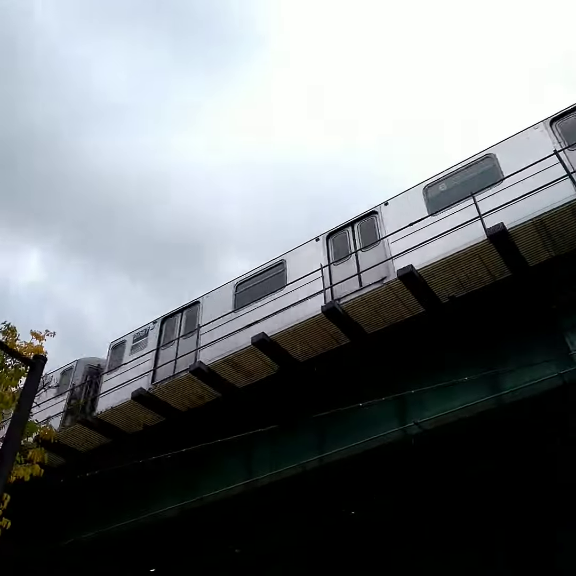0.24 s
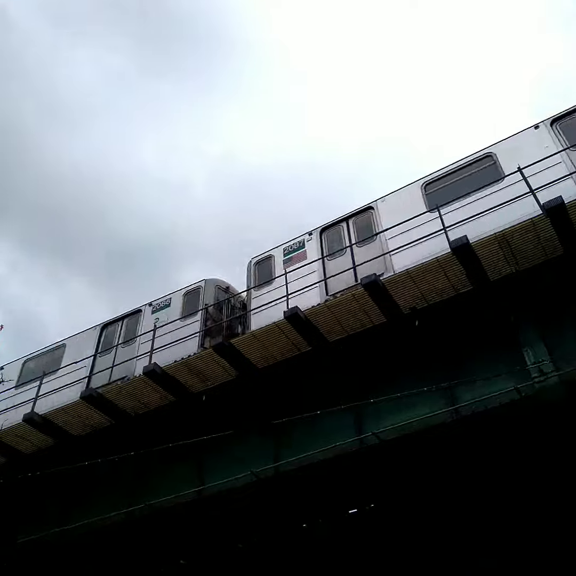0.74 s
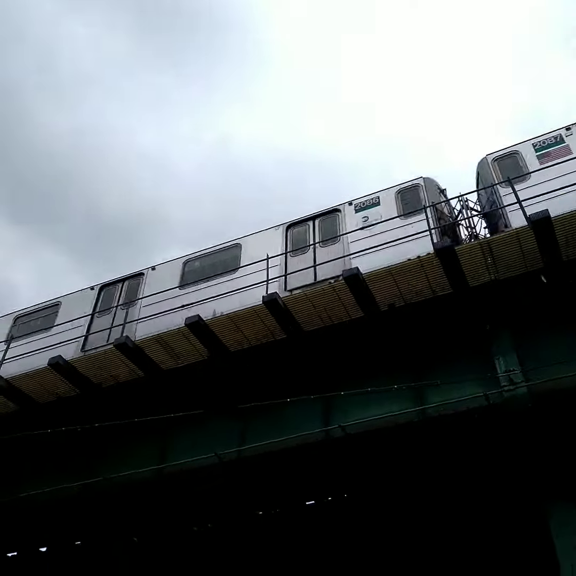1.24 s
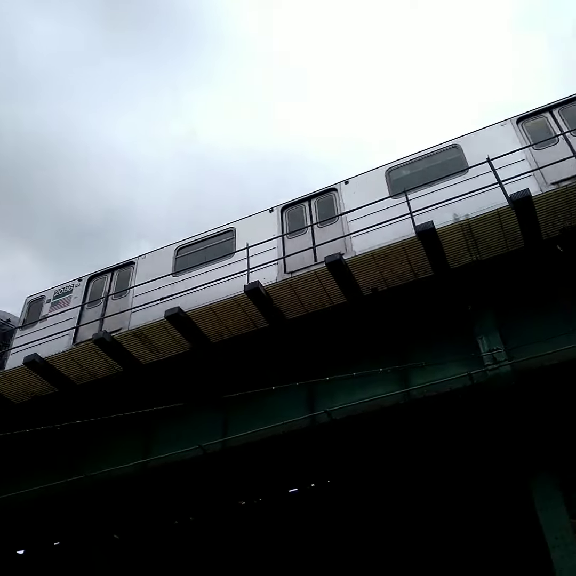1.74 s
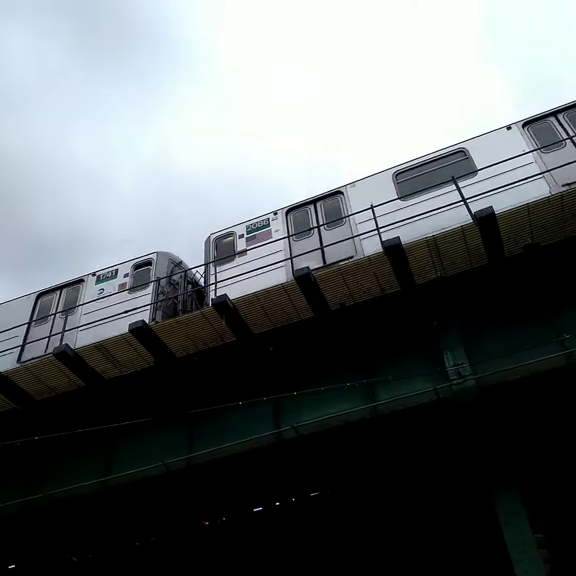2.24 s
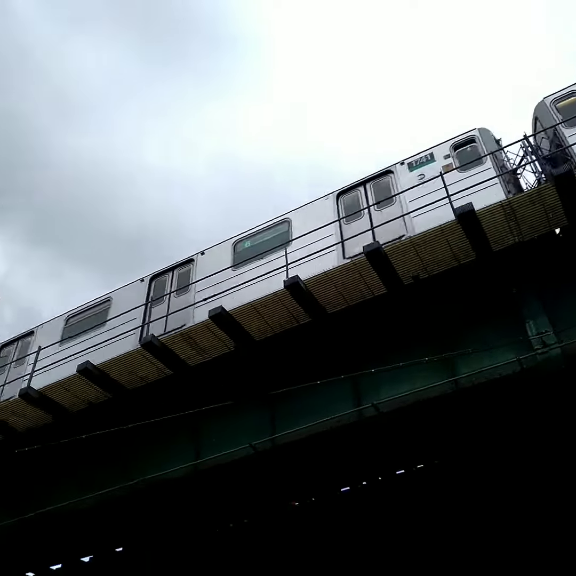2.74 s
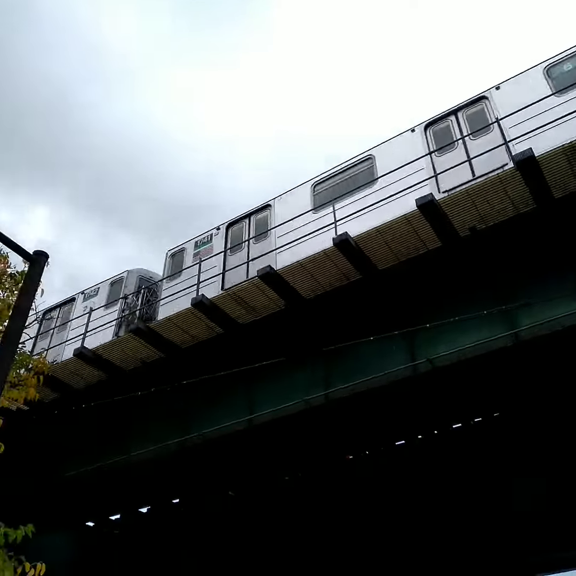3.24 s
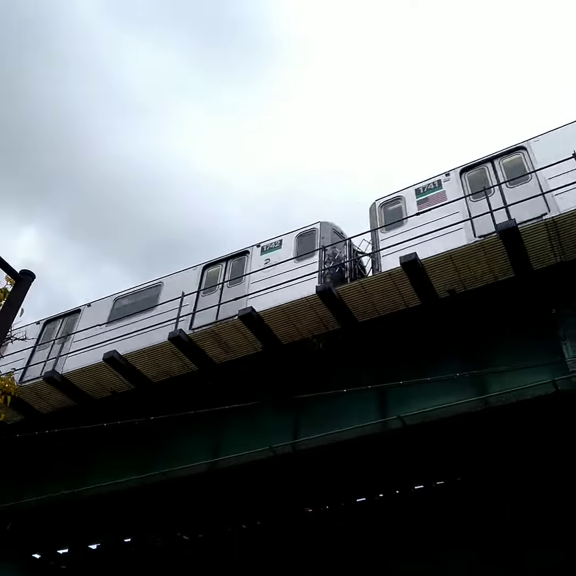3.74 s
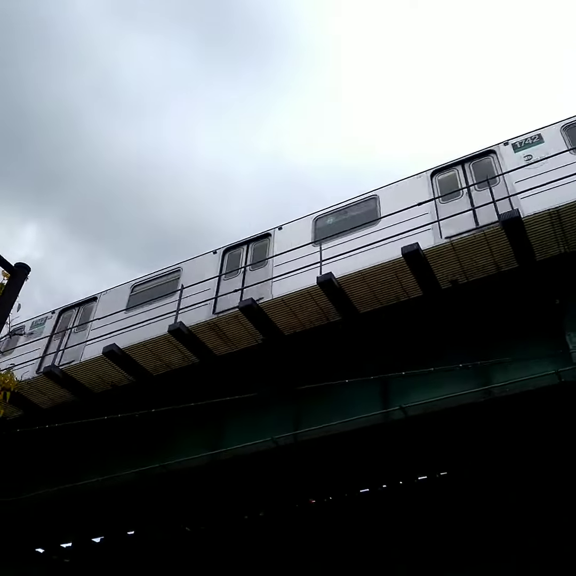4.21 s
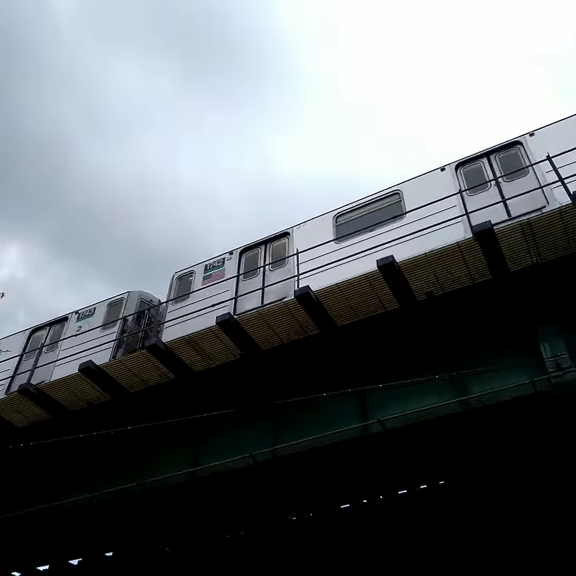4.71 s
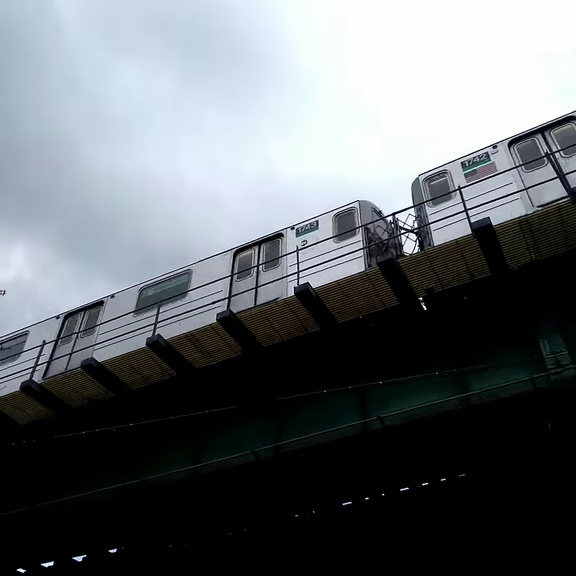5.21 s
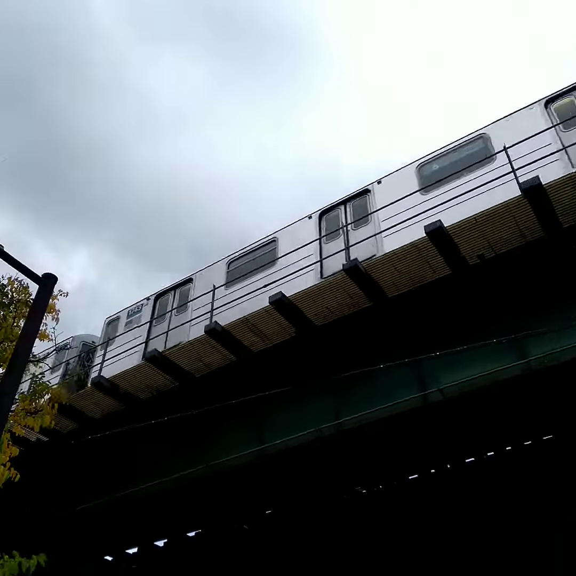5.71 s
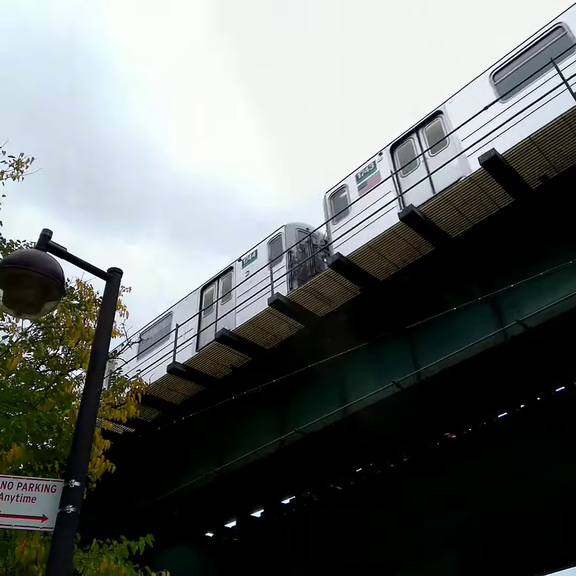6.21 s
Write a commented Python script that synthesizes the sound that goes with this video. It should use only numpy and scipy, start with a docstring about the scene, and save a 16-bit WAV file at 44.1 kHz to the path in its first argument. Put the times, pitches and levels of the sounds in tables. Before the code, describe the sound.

A subway train is already rolling overhead on a steel viaduct as the sound begins, heard outdoors from the street below. A low shudder and rough rolling roar run throughout, with a thin, grainy wheel hiss on top. Hollow, quickly damped girder thuds come irregularly, crowding together as wheel sets pass: about 0.5 to 1.1 seconds, 1.9 to 2.7, 3.2 to 4.1, 4.7 to 5.4, and again from 6.0. Between these swells the rumble eases, leaving scattered knocks and faint rail clacks, such as around 1.5, 2.9, 4.3 and 5.7. Short, hissy flange scrapes flick by near 1.2, 2.2, 3.4 and 5.2, strongest around 6.1 to 6.2. Nothing squeals for long. Bass is shared across the stereo image, while the treble leans left and the right stays dull. It ends near 6.5 seconds with the train still passing.

```python
"""Subway train on a steel viaduct

A train rolls overhead, above the street. Shaped, flickering noise makes the rolling, and each pair of bogies
swells it. Wheel blows ring girder plates as fading sines, rail joints clack and flanges hiss as filtered noise
bursts, and short faint sines give the treble a metallic grain. The phone's right port faces away and is dull."""
import sys
import numpy as np
from scipy import signal
from scipy.fft import rfft, irfft, next_fast_len
from scipy.io import wavfile
from scipy.ndimage import uniform_filter1d

SR = 44100
rng = np.random.default_rng(int(sys.argv[2]) if len(sys.argv) > 2 else 0)


def pcm_store(signal):
    """Save signal as 16-bit PCM."""
    levels = np.round(np.clip(np.atleast_2d(signal), -1, 1) * 32767)
    wavfile.write(sys.argv[1], SR, levels.astype(np.int16).T)


N = 285059
PAD = next_fast_len(N)
HZ = np.arange(PAD // 2 + 1) * SR / PAD  # the frequency of each spectrum bin


def undb(db):
    """Turns dB into an amplitude factor."""
    return 10 ** (np.asarray(db) / 20)


def along(table, hz):
    """Reads (Hz, value) rows on a log-frequency axis."""
    table_hz, value = np.transpose(table)
    return np.interp(np.log(np.maximum(hz, 1)), np.log(table_hz), value)


def walk(rate):
    """Random levels, `rate` new ones per second, smoothed twice so they glide."""
    hold = int(SR / rate)
    steps = np.repeat(rng.standard_normal(N // hold + 1), hold)[:N]
    return uniform_filter1d(uniform_filter1d(steps, hold), hold)


# How alike the sound is at the two ports. Each row: frequency in Hz, likeness (1 = the same, 0 = unrelated).
PORT_LIKENESS = [(60, 0.95), (130, 0.93), (290, 0.84), (640, 0.5), (1410, 0.03), (3100, -0.01), (6820, 0.0),
                 (15000, 0.01)]
PORT_LAG_S = 0.00018  # the shared sound reaches the left port this much earlier


def field():
    """Spectrum of white noise at both ports: the bass arrives alike, the scattered treble does not."""
    alike = np.clip(along(PORT_LIKENESS, HZ), 0, 1)
    shared, other = rfft(rng.standard_normal((2, PAD)))
    left = shared * np.exp(2j * np.pi * HZ * PORT_LAG_S)
    right = alike * shared + np.sqrt(1 - alike ** 2) * other
    return np.array([left, right])


# What wheels and rail ring with. Each row: middle pitch in Hz before a small random shift, width in Hz,
# level in dB over the hiss around it (below 0 is a dip).
WHEEL_RESONANCES = [(1293, 77, -1.5), (1688, 60, -2), (2040, 120, 3.5), (3270, 290, 4.5), (4115, 190, 10),
                    (5200, 71, 3), (5730, 150, 8), (6000, 37, -2), (7000, 100, 11), (7030, 72, 7),
                    (7630, 140, 11)]


def ringing():
    """Gain of wheel and rail over frequency: narrow resonances that sit a little differently on every call."""
    shift = 1 + 0.011 * rng.standard_normal(len(WHEEL_RESONANCES))
    power = 1
    for (hz, width, db), k in zip(WHEEL_RESONANCES, shift):
        power = power + (undb(2 * db) - 1) / (1 + (2 * (HZ - hz * k) / width) ** 2)
    return np.sqrt(power)


RING_IN_ROLL = 0.53  # share of the wheel's resonances, in dB, heard in steel noise


def texture(spectrum, shared_db, own_db, rate, rattle_db):
    """Steel noise in third-octave bands that throb together, flicker alone and rattle quickly; left rms is 1."""
    noise = field() * undb(along(spectrum, HZ)) * ringing() ** RING_IN_ROLL
    throb = shared_db * walk(rate) + rattle_db * walk(220)
    lo, hi = np.log2(spectrum[0][0]), np.log2(spectrum[-1][0])
    out = 0
    for octave in np.arange(lo, hi + 1 / 3, 1 / 3):
        band = np.clip(1 - 3 * abs(np.log2(HZ + 1) - octave), 0, 1)
        level = undb(throb + own_db * walk(2 * rate))
        out = out + level * irfft(noise * band, PAD)[:, :N]
    return out / out[0].std()


def contact(slow_db, quick_db):
    """Steel on steel through the ringing wheel: it comes in uneven lumps and quick grains."""
    grains = irfft(field(), PAD)[:, :N] * undb(slow_db * walk(45) + quick_db * walk(300))
    return irfft(rfft(grains, PAD) * ringing(), PAD)[:, :N]


def burst(noise, s, hz, width_hz, length, rise, t60):
    """Noise in one resonance: swells, holds while the contact lasts, dies; returns its place and sound."""
    i = int(s * SR)
    t = np.arange(min(int(.4 * SR), N - i)) / SR
    swell = np.sin(np.pi / 2 * np.minimum(t / rise, 1)) ** 2
    shape = swell * undb(-60 * np.maximum(t - length, 0) / t60)
    edges = [hz - width_hz / 2, min(hz + width_hz / 2, .45 * SR)]
    sos = signal.butter(1, edges, "band", fs=SR, output="sos")
    rung = signal.sosfilt(np.vstack([sos, sos]), noise[:, i:i + len(t)])
    left_rms = np.sqrt(np.sum((shape * rung[0]) ** 2) / np.sum(shape ** 2))
    return slice(i, i + len(t)), shape * rung / left_rms


# Bogies passing overhead, two at each coupling. Each row: nearest moment in seconds, then the levels they add
# in dB: girder rumble, deck drone, rail roar, wheel hiss, airy treble.
BOGIES = [(0.74, -19, -33, -30.5, -39, -51), (1.1, -21, -54, -29, -35.5, -47),
          (2.16, -20, -25, -31.5, -37, -48), (2.6, -23, -48, -31, -34, -50),
          (3.48, -24, -35, -28.5, -38, -51), (3.92, -24.5, -56, -33.5, -34.5, -48),
          (4.88, -21.5, -28.5, -29, -33.5, -46), (5.34, -24, -31.5, -30.5, -35.5, -50),
          (6.22, -22.5, -30.5, -32, -37.5, -50)]


def load():
    """Gain of rumble, drone, roar, hiss and air: a bed, and a swell as each bogie comes and goes."""
    # one value each for rumble, drone, roar, hiss, air
    far_db = np.c_[[-27, -39, -33, -38.5, -52]]  # at the start, with no bogie near
    drift_db_per_s = np.c_[[0.096, 1.16, -0.21, 0.13, .05]]
    swell_s = np.c_[[0.19, 0.13, 0.19, 0.21, .22]]
    swell_edge = 2.5  # steepness of a swell's flanks, 2 = bell
    t = np.arange(N) / SR
    power = undb(2 * (far_db + drift_db_per_s * t))
    for s, *near_db in BOGIES:
        swell = np.exp(-abs((t - s) / swell_s) ** swell_edge)
        power = power + undb(2 * np.c_[near_db]) * swell
    return np.sqrt(power)


# Tone colour of each rolling layer, from low to high: columns, girders, deck, rails, wheels, airy wash.
# Each row: frequency in Hz, strength per Hz in dB relative to the rest of its layer, before the resonances.
SHUDDER_COLOUR = [(12, -51), (20, -40), (52, -3), (62, -7.5), (70, 2), (80, -2.5), (102, -8.5), (170, -10),
                  (220, -41), (370, -120)]
RUMBLE_COLOUR = [(71, -54), (120, -10), (204, -3.5), (252, -2.5), (296, -3), (382, -4), (468, -4.5),
                 (600, -15), (780, -23), (1320, -120)]
DRONE_COLOUR = [(330, -69), (560, -0.5), (1050, -21), (1360, -29), (2310, -120)]
ROAR_COLOUR = [(470, 6), (800, 1), (1090, -4), (1690, -3), (2780, -12.5), (3300, -12.5), (3720, -16.5),
               (4100, -21.5), (4800, -15), (6240, -41), (10600, -120)]
HISS_COLOUR = [(2350, 1.5), (4000, -0.5), (5210, -0.5), (5750, -2), (6310, 1), (7000, 1.5), (7810, 1.5),
               (8500, 2), (9230, 0.5), (10100, -8.5), (10800, -11), (11500, -18), (14800, -24),
               (15900, -24)]
AIR_COLOUR = [(8800, -30), (10300, 0), (11500, -3), (13000, -6), (14800, -7), (15900, -12)]
# Level of the columns' low shudder. Each row: time in seconds, level in dB.
SHUDDER_LEVEL = [(0.0, -32.5), (0.9, -42), (1.35, -31), (1.55, -36), (1.75, -32.5), (2.45, -45),
                 (2.66, -35), (2.8, -37.5), (3.35, -33.5), (3.6, -39), (4.35, -33), (5.3, -34.5),
                 (5.55, -38.5), (6.46, -33)]


def rolling(gains):
    """Wheel and rail roughness shakes columns, girders, deck, rails and wheels; an airy wash rides on top."""
    rumble, drone, roar, hiss, air = gains
    shudder = undb(np.interp(np.arange(N) / SR, *np.transpose(SHUDDER_LEVEL)))
    # texture settings: throb in dB, flicker in dB, throb changes per second, rattle in dB
    out = shudder * texture(SHUDDER_COLOUR, 1.2, 2., 5.5, .1)
    out += rumble * texture(RUMBLE_COLOUR, 2.8, 2.6, 11, 0.13)
    out += drone * texture(DRONE_COLOUR, 0.35, 6.5, 13, 0.86)
    out += roar * texture(ROAR_COLOUR, 1.5, 2.2, 19, 2.1)
    out += hiss * texture(HISS_COLOUR, 0.49, 1.2, 28, 2.2)
    out += air * texture(AIR_COLOUR, 1.2, 1.1, 9, 1.1)
    return out


def treble_grains(hiss, count=420):
    """Short faint tones at chance moments and pitches give the treble a metallic grain, stronger under a bogie."""
    base_db, scatter_db, rise_db_per_oct = -9.5, 3., 0.5  # base is relative to the wheel hiss
    rise_s, t60_s = 0.0057, 0.099
    out, t = np.zeros((2, N + SR)), np.arange(SR // 12) / SR
    for when, pitch, size, *phase in rng.uniform(0, 1, (count, 5)):
        at, octaves = int(when * (N - 1)), 3 * pitch
        # few tones are strong; the level rises slightly with pitch
        db = base_db - scatter_db * np.log(size + .01) + rise_db_per_oct * octaves
        shape = np.minimum(t / rise_s, 1) * undb(db - 60 * t / t60_s)
        cycles = 1100 * 2 ** octaves * t + np.c_[phase]  # each port has its own phase
        out[:, at:at + len(t)] += hiss[at] * shape * np.sin(2 * np.pi * cycles)
    return out[:, :N]


# Tone colour of the scraping noise. Each row: frequency in Hz, relative strength per Hz in dB.
SCRAPE_COLOUR = [(2000, 0), (8500, 0), (15800, -4)]
# Flanges scraping the rail. Each row: start in seconds, rim hiss level in dB, rim centre in Hz, basic width as a
# share of the centre (widened below), time from start to fade in seconds, web hiss level in dB.
SCRAPES = [(0.567, -35.5, 6950, 0.43, 0.042, -40), (0.89, -46, 8100, .16, 0.032, -34),
           (1, -35, 6670, .16, 0.032, -34.5), (1.07, -49, 6900, .19, 0.08, -35.5),
           (0.11, -44, 7360, 0.21, 0.025, -56), (1.192, -31.5, 5630, 0.1, 0.027, -32),
           (1.248, -48, 7700, 0.09, 0.027, -45), (1.341, -37, 6900, .16, 0.028, -38),
           (2.596, -41, 6650, 0.18, .04, -38), (2.187, -30.5, 5740, 0.24, 0.023, -36),
           (2.417, -36, 6500, 0.19, 0.037, -38), (3.385, -29.5, 6560, 0.18, 0.073, -39),
           (3.49, -39, 6800, 0.17, 0.064, -58), (3.548, -38, 7100, 0.22, 0.061, -54),
           (3.79, -37, 7460, .14, 0.035, -36), (3.86, -42, 6560, 0.13, 0.037, -40),
           (4.015, -34, 5670, 0.088, 0.041, -48), (4.14, -40, 6720, .16, 0.024, -40),
           (4.625, -31.5, 6760, 0.12, 0.049, -57), (4.862, -33.5, 6800, 0.14, 0.053, -38),
           (5.149, -32, 6960, 0.13, 0.086, -30.5), (5.18, -30.5, 5560, 0.15, 0.07, -56),
           (5.274, -44, 6500, .2, 0.032, -42), (5.343, -29, 6650, 0.14, 0.046, -33.5),
           (6.084, -27, 6440, 0.19, 0.03, -30), (6.13, -28, 6930, 0.082, 0.03, -55),
           (6.207, -25.5, 5200, 0.48, 0.029, -27.5), (6.282, -38, 5960, 0.26, 0.044, -38)]


def scrapes():
    """A flange sticks and slips on the rail head: a patchy hiss from the wheel rim, a lower one from its web."""
    rise_s, t60_s, rasp_db = 0.023, 0.28, -9  # the broad rasp is set relative to the rim hiss
    out, noise = np.zeros((2, N)), texture(SCRAPE_COLOUR, 1.6, 1.7, 30, 1.1)
    for s, db, hz, spread, length, web_db in SCRAPES:
        rim = (hz, min(spread + 0.1, 1.2) * hz, db)
        web = (3200., 1900., web_db)
        rasp = (9000., 12500., db + rasp_db)
        for centre, width, gain_db in (rim, web, rasp):
            at, sound = burst(noise, s, centre, width, length, rise_s, t60_s)
            out[:, at] += undb(gain_db) * sound
    return out


# Wheels over rail joints. Each row: start in seconds, level in dB, centre of the rattle in Hz.
CLACKS = [(0.102, -27.5, 1270), (.338, -29, 1280), (0.541, -30.5, 1890), (.879, -34, 1690),
          (1.002, -34, 2020), (1.215, -30.5, 1680), (1.33, -30, 1650), (1.36, -39, 1870),
          (1.53, -28.5, 1830), (1.61, -33.5, 990), (1.759, -29, 1810), (1.953, -31.5, 2040),
          (2.099, -34, 1580), (2.153, -33, 1660), (2.744, -26, 1840), (2.927, -28.5, 1780),
          (3.156, -28.5, 1830), (3.337, -39, 1670), (3.982, -33.5, 1760), (4.112, -32.5, 1530),
          (4.305, -30.5, 1820), (4.528, -30, 1700), (4.71, -31.5, 1360), (5.15, -35.5, 1220),
          (5.472, -31, 1890), (5.657, -34.5, 1830), (5.867, -35, 1730), (6.075, -34, 1450),
          (6.146, -33, 1570)]


def clacks():
    """A joint rattles the rail web for a few hundredths of a second, with a broad bright edge, then dies away."""
    rise_s, length_s, t60_s, edge_db = .012, 0.023, 0.3, -10  # the bright edge is set relative to the body
    out, noise = np.zeros((2, N)), contact(3.8, 1.5)
    for s, db, hz in CLACKS:
        body = (hz, 0.45 * hz, db)
        edge = (4600., 4400., db + edge_db)
        for centre, width, gain_db in (body, edge):
            at, sound = burst(noise, s, centre, width, length_s, rise_s, t60_s)
            out[:, at] += undb(gain_db) * sound
    return out


def light_blows(rumble, count=40):
    """Rows like the strong blows: chance moments and pitches, their strength following the rumble."""
    over_rumble_db, scatter_db = -3, 1
    middle_hz, spread_octaves, push_s = 367.5, 0.89, 0.00727
    when, size, pitch = rng.uniform(-1, 1, (count, 3)).T
    at = (SR // 20 + (N - SR // 10) * (when + 1) / 2).astype(int)
    hz = middle_hz * 2 ** (spread_octaves * pitch)
    db = 20 * np.log10(rumble[at]) + over_rumble_db + scatter_db * size
    return list(zip(at / SR, db, hz, np.full(count, push_s), np.zeros(count)))


# Girder plates. Each row: pitch in Hz before a load pulls it, time for the ring to fall 60 dB in seconds.
PLATES = [(70, 0.35), (100, 0.12), (125, 0.06), (165, 0.26), (198, 0.23), (222, 0.2), (262, 0.16),
          (293, 0.18), (333, 0.24), (375, 0.21), (412, 0.29), (455, 0.15), (485, 0.27), (530, 0.098),
          (610, 0.25), (660, 0.18), (715, 0.13)]
# Strong wheel blows into the girders. Each row: moment the push begins in seconds, after the build-up, level in dB,
# pitch in Hz that picks and pulls the plates, length of the push in seconds, left over right in dB.
STRONG_BLOWS = [(0.128, -15.5, 478, 0.0077, -2), (0.216, -17, 186, 0.01, 5.0),
                (0.411, -10, 465, 0.0021, 3.0), (0.491, -27, 333, 0.0067, 0.0),
                (0.527, -8.5, 282, 0.024, -3.5), (0.569, -11.5, 334, 0.018, 7),
                (0.569, -8.5, 468, 0.03, -3), (0.605, -18, 306, 0.073, 4), (0.619, -19.5, 425, 0.062, -2),
                (0.661, -8.5, 191.5, 0.012, 1), (0.726, -12, 296, 0.011, -2), (0.8, -13, 299, 0.069, 7),
                (0.838, -25, 457, 0.039, -7), (0.928, -14, 266, 0.022, 8), (0.948, -15.5, 365, 0.0055, 10),
                (0.95, -24, 613, 0.004, -10), (0.968, -17, 208, 0.008, 9), (0.996, -20.5, 101, 0.014, 3),
                (1.04, -18, 408, 0.03, -12), (1.048, -11, 307.4, 0.047, -4),
                (1.066, -15.5, 206, 0.027, 6.0), (1.131, -13.5, 296, 0.032, -5),
                (1.137, -23, 680, 0.005, -9), (1.143, -15.5, 386, 0.02, -12),
                (1.193, -21, 365, 0.0066, -20), (1.273, -18, 261, 0.01, -6), (1.321, -14, 131, 0.011, 7),
                (1.487, -14.5, 197, 0.0051, -5), (1.539, -16, 367, 0.0041, -3), (1.712, -16, 350, 0.009, 5),
                (1.78, -14.5, 300, 0.034, 1.0), (1.83, -13, 345, 0.042, 6.5), (1.924, -8, 384, 0.0068, 3.0),
                (1.95, -9, 284, 0.0083, 4), (1.982, -18, 240, 0.004, -9), (1.987, -14.5, 327, 0.024, 3),
                (2.013, -11.5, 445, 0.0075, 6), (2.026, -18, 605, 0.0041, -2), (2.029, -15, 305, 0.032, 4),
                (2.029, -11, 360, 0.0062, -5.0), (2.083, -16, 212, 0.021, -6), (2.091, -18, 626, 0.01, 9),
                (2.091, -13.5, 303, 0.0096, -4), (2.145, -14, 308, 0.034, 1.0),
                (2.173, -20.5, 680, 0.014, 10), (2.177, -17.5, 520, 0.012, 4.0),
                (2.195, -15, 357, 0.024, -1), (2.201, -14.5, 435, 0.013, 10), (2.205, -26, 202, 0.02, -6.0),
                (2.243, -15, 286, 0.03, 13), (2.273, -20.5, 226, 0.057, -5), (2.357, -13.5, 306, 0.024, 0),
                (2.399, -29, 310, 0.028, 2), (2.434, -21, 369, 0.066, -14), (2.464, -13, 290, 0.021, -3),
                (2.498, -21, 218, 0.058, -2.0), (2.518, -10, 320, 0.011, -1.0),
                (2.552, -14, 399, 0.022, -9), (2.58, -12.5, 460, 0.0089, 13),
                (2.598, -18, 352, 0.016, -6.0), (2.622, -17, 427, 0.02, -4), (2.622, -14, 116, 0.01, 2.5),
                (2.66, -13, 270, 0.019, 2), (2.732, -16, 296, 0.026, -4), (2.895, -24.5, 638, 0.004, -5),
                (2.915, -9.5, 297, 0.0032, 0.5), (3.05, -13.5, 425, 0.0042, 3),
                (3.082, -16, 509, 0.0047, 11), (3.139, -16.5, 295, 0.013, 0), (3.193, -8.5, 469, 0.0023, 5),
                (3.259, -9.5, 212, 0.0096, 2), (3.308, -11.5, 287, 0.022, -1),
                (3.344, -11, 405, 0.0066, -10), (3.41, -7.5, 480, 0.0054, 5), (3.466, -15, 212, 0.022, 0.0),
                (3.532, -23, 391, 0.027, -6), (3.586, -15.5, 377, 0.035, -8), (3.612, -14, 187, 0.0047, -4),
                (3.638, -12.5, 293, 0.043, 3), (3.656, -16, 207, 0.022, -2.0),
                (3.684, -16.5, 352, 0.023, -11), (3.767, -22, 390, 0.024, -4.0),
                (3.831, -17, 442, 0.0023, -13), (3.857, -15, 289, 0.0087, 19),
                (3.963, -9.5, 469, 0.0083, -4), (3.981, -13.5, 407, 0.018, -5),
                (4.047, -22, 452, 0.0163, -1.0), (4.089, -16, 301, 0.012, 2),
                (4.133, -12.5, 410, 0.0068, -3.0), (4.272, -15, 180, 0.0055, -5),
                (4.516, -11.5, 330, 0.0082, 2.0), (4.651, -15.5, 230, 0.016, 1),
                (4.695, -15, 482, 0.009, 13), (4.713, -15, 198, 0.016, -4), (4.769, -12.5, 380, 0.0071, 7),
                (4.785, -23, 588, 0.019, 14), (4.787, -14, 469, 0.011, 16), (4.819, -13.5, 453, 0.02, 7),
                (4.831, -13.5, 187, 0.025, -5), (4.875, -10.5, 267, 0.0072, -3),
                (4.923, -14.5, 508, 0.046, 9), (4.941, -11, 423, 0.02, -3), (5.013, -7, 283, 0.006, 2.0),
                (5.035, -15.5, 219, 0.019, -6), (5.037, -17, 325, 0.024, -1.0),
                (5.108, -18, 209, 0.054, -8), (5.152, -16, 510, 0.0033, 13), (5.208, -21, 573, 0.014, -8),
                (5.234, -13, 493, 0.027, 2), (5.302, -14, 194, 0.0073, 2), (5.31, -12, 454, 0.0081, 3),
                (5.312, -17.5, 526, 0.035, -1), (5.328, -12, 186, 0.0058, -8),
                (5.404, -13.5, 397, 0.0102, 2), (5.434, -16.5, 347, 0.034, -4.0),
                (5.478, -22, 640, 0.0057, -3), (5.806, -23, 396, 0.0076, 0), (5.882, -23, 283, 0.006, 0.0),
                (5.885, -23, 663, 0.012, -8), (5.991, -19, 222, 0.0082, 4), (6.056, -9.5, 204, 0.0077, 3),
                (6.096, -20, 502, 0.018, -10), (6.148, -13, 491, 0.026, -1.0),
                (6.178, -23, 303, 0.022, -10), (6.19, -23, 492, 0.016, 13), (6.218, -19, 337, 0.0087, 3),
                (6.24, -20.5, 212, 0.034, 4), (6.378, -9.5, 201, 0.0095, 4), (6.423, -13, 506, 0.0051, -2),
                (0.6, -10.5, 515, 0.013, 5), (0.805, -21, 560, .015, -1), (1.964, -26, 560, 0.0059, 1.5),
                (2.489, -20, 536, .006, 3), (4.153, -24, 550, 0.0058, 1.5),
                (5.451, -20.5, 516, 0.0058, 1.5), (6.028, -24, 545, 0.0056, 1.5),
                (1.375, -21, 543, 0.0086, 1.5)]


def blows(rows):
    """Each blow rings the plates near its own pitch, a short one more of them; the axle's weight pulls their pitch."""
    reach_hz, short_reach = 16.3, 0.18  # shorter pushes reach further: short_reach / push is added, in Hz
    rise = .005  # seconds: a blow gathers along the span
    pull = .6  # share of the way a loaded plate's pitch moves toward the blow's
    loose, apart = 0.11, 0.25  # phase scatter: between plates in cycles, between ports in radians each way
    out, t = np.zeros((2, N + SR)), np.arange(SR // 3) / SR
    all_hz, all_t60 = np.transpose(PLATES)
    chance = rng.standard_normal((len(rows), 1 + 2 * len(PLATES)))
    for (s, db, centre, push, pan_db), row in zip(rows, chance):
        share = np.exp(-.5 * ((all_hz - centre) / (reach_hz + short_reach / push)) ** 2)
        near = share > share.max() / 50
        hz, t60, share = all_hz[near], all_t60[near], share[near, None]
        phase, turn = row[1:].reshape(2, -1, 1)[:, near]

        build = 1 - np.exp(-(t / rise) ** 2)
        fade = undb(-60 * np.maximum(t - rise - push, 0) / t60[:, None])
        ring = share / np.sum(share) * fade * build

        # the plates swing nearly in step around the middle of the push
        loaded = (hz + pull * (centre - hz))[:, None]
        swing = 2 * np.pi * (loaded * (t - rise - push / 2) + row[0] + loose * phase)
        pair = []
        for side in (1, -1):  # left, right
            heard = np.sum(ring * np.sin(swing + side * apart * turn), axis=0)
            pair.append(heard * undb(side * pan_db / 2))
        start = int((s - rise) * SR)
        out[:, start:start + len(t)] += undb(db) * np.array(pair)
    return out[:, :N]


def scene():
    """Adds the rolling, treble grains, scrapes, clacks and blows of the passing train."""
    gains = load()
    rumble, hiss = gains[0], gains[3]
    all_blows = STRONG_BLOWS + light_blows(rumble)
    return rolling(gains) + treble_grains(hiss) + scrapes() + clacks() + blows(all_blows)


# Shading of the right port. Each row: frequency in Hz, left over right in dB.
PORT_SHADE = [(60, -1.0), (110, -0.5), (200, 0.0), (380, 0.0), (700, 1.0), (1290, 2.0), (2380, 6.0),
              (4400, 11.0), (8120, 19.0), (15000, 16.0)]


def record(dry):
    """The phone's body shades the right port from the treble; loud peaks are rounded and the top is cut."""
    right = irfft(rfft(dry[1], PAD) * undb(-along(PORT_SHADE, HZ)), PAD)[:N]
    rounded = np.tanh(1.2 * np.array([dry[0], right])) / 1.2
    top_cut = signal.ellip(10, .2, 70, 15850, fs=SR, output="sos")  # low-pass at 15850 Hz
    return signal.sosfilt(top_cut, rounded)


dry = scene()
out = record(dry)
pcm_store(out)
```